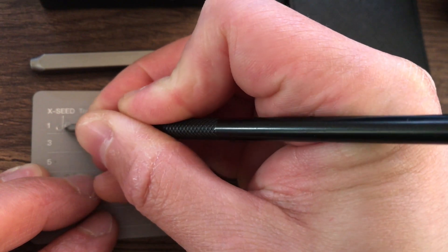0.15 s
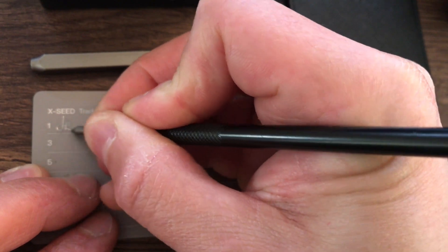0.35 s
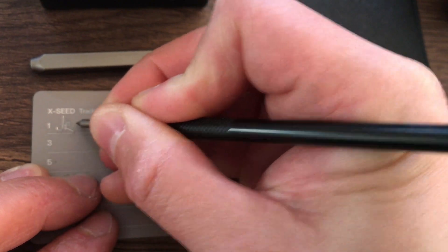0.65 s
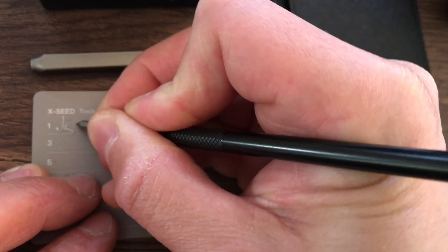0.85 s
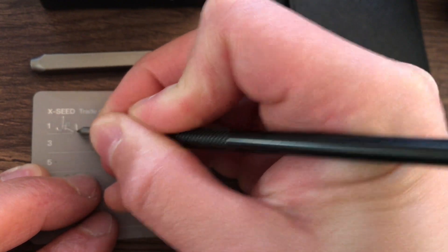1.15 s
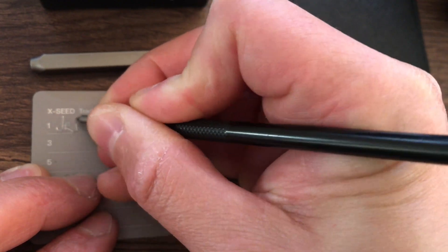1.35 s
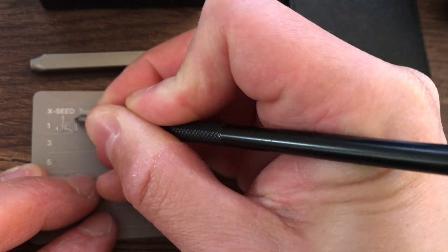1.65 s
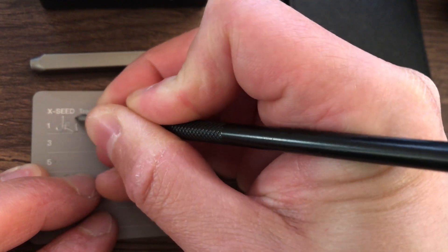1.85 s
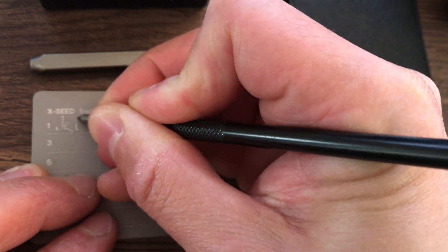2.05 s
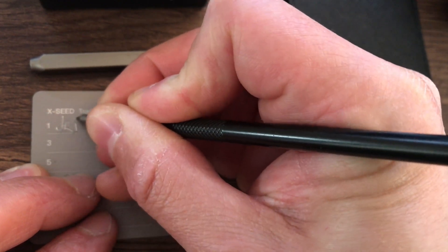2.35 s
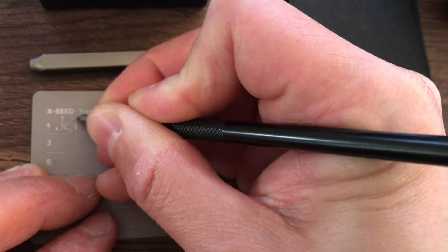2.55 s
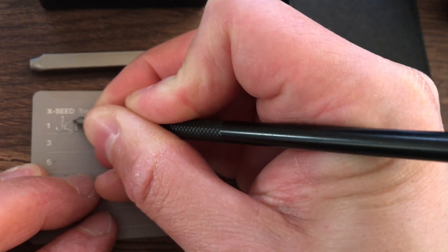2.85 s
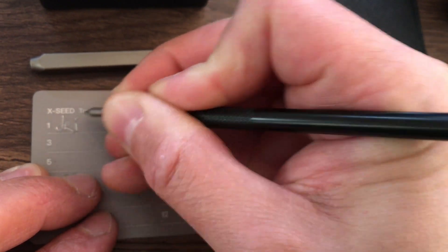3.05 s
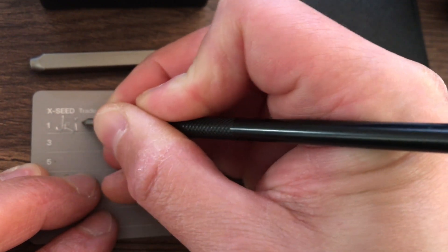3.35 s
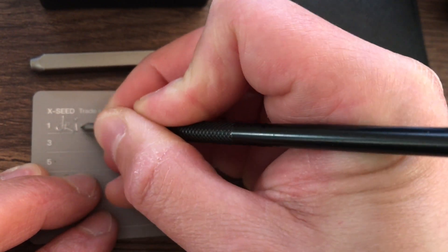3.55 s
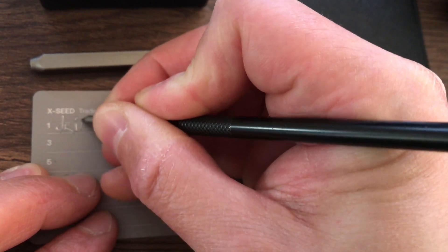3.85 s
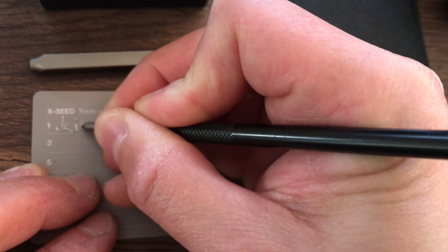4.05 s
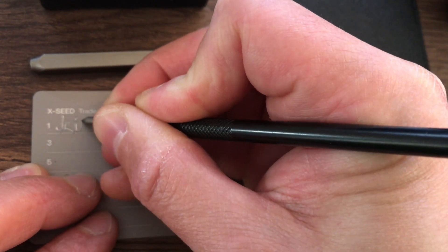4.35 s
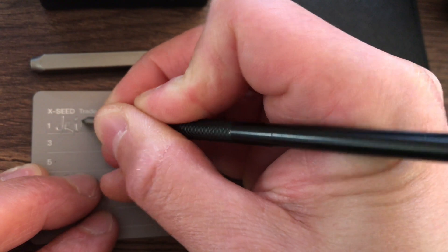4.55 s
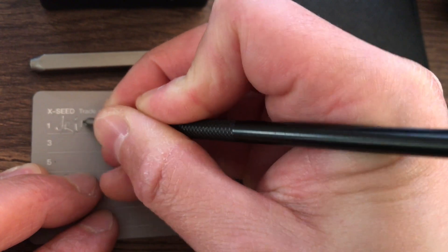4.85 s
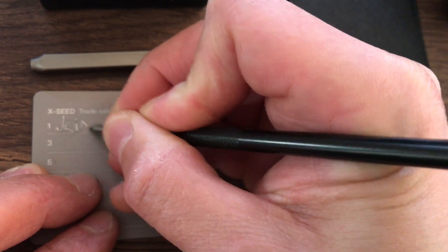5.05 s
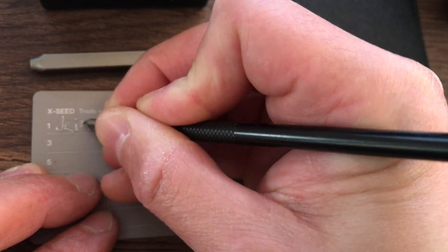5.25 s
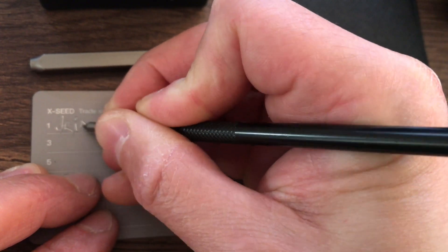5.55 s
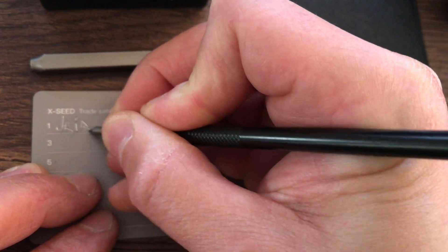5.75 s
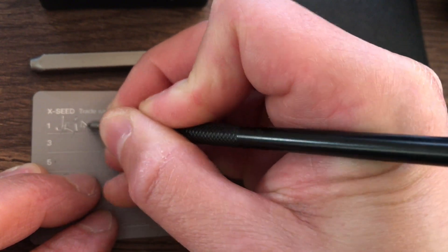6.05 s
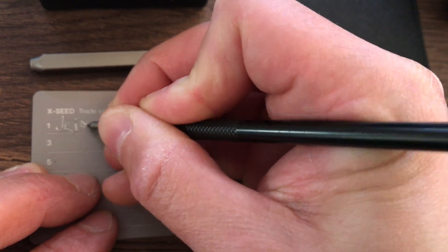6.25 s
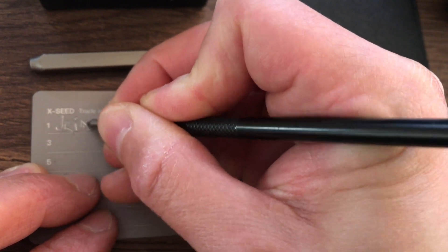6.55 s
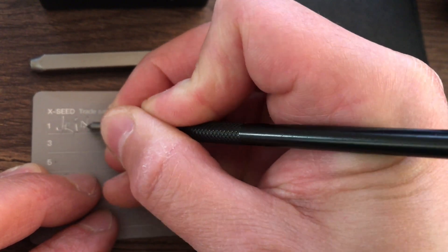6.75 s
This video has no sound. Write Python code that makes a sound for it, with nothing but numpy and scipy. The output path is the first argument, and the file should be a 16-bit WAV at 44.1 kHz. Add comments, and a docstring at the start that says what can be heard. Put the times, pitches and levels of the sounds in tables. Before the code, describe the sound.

A metal pen tip scratches quick, irregular little strokes into a metal plate, with light taps and snags.

```python
"""Engraving pen on aluminium.

A metal tip scratches small marks into a plate held on a wooden desk. It lands with a tap,
ploughs on in tiny slips and snags on burrs; some strokes carry a brief, rough squeal. Pen, plate
and desk ring with every slip, the hand rumbles on the desk, and a small quiet room answers faintly."""
import sys
import numpy as np
from scipy import signal
from scipy.fft import rfft, irfft, next_fast_len
from scipy.io import wavfile
from scipy.ndimage import uniform_filter1d

SR = 44100
rng = np.random.default_rng(int(sys.argv[2]) if len(sys.argv) > 2 else 0)


def dump(signal):
    """Clip the signal to [-1, 1] and save it as 16-bit WAV at the path in sys.argv[1]."""
    limited = np.clip(np.atleast_2d(signal).T, -1, 1)
    pcm = np.round(limited * 32767).astype(np.int16)
    wavfile.write(sys.argv[1], SR, pcm)


N = 303849
FFT_SIZE = next_fast_len(N + SR, True)
BIN_HZ = np.fft.rfftfreq(FFT_SIZE, 1 / SR) + 1  # offset avoids division by zero

# Pen strokes: start_s, length_s, crest_fraction, level_db, bright_db, thud_db
STROKES = [(0.0, 0.17, 0.18, -51, -7.5, 0.5), (0.137, 0.047, 0.32, -59, -3, 6),
           (0.25, 0.17, 0.1, -62, -4.5, 5.5), (0.324, 0.064, 0.72, -52.5, -7, 3.5),
           (0.374, 0.036, 0.66, -41, -2.5, -1.5), (0.855, 0.061, 0.89, -46.5, 4, -5),
           (0.909, 0.059, 0.67, -59.5, 3.5, -15), (1.018, 0.042, 0.35, -38, -4.5, -9.5),
           (1.424, 0.071, 0.53, -60, -6, -6), (1.563, 0.033, 0.92, -49.5, -1, -5),
           (1.68, 0.074, 0.65, -50.5, 2.5, -7), (1.749, 0.088, 0.53, -60, 1, 9),
           (1.812, 0.067, 0.57, -50.5, -4.5, 1.5), (2, 0.057, 0.65, -51.5, 2.5, -4.5),
           (2.079, 0.12, 0.32, -52, -0.5, -1), (2.212, 0.079, 0.63, -50, 0, 3),
           (2.299, 0.1, 0.29, -46.5, 0.5, -5), (2.412, 0.078, 0.45, -50.5, -6, 0.5),
           (2.481, 0.08, 0.46, -49, -2, -4), (2.578, 0.077, 0.17, -57.5, -5, 2),
           (2.649, 0.05, 0.02, -48, -2, -4.5), (2.698, 0.047, 0.61, -48, 1, -3),
           (2.759, 0.038, 0.97, -42.5, 4, -5.5), (2.829, 0.04, 0.08, -42.5, -5, -17),
           (2.886, 0.024, 0.6, -45.5, 0.5, -9), (2.92, 0.037, 1, -57, -6, 1),
           (3.494, 0.083, 0.66, -46, -1, -5), (3.631, 0.04, 0.38, -45.5, -1.5, -4.5),
           (3.746, 0.056, 0.68, -48.5, -2, -3), (3.813, 0.046, 0.52, -42, -3.5, -9.5),
           (3.962, 0.049, 0.19, -50, -2, -2.5), (4.071, 0.034, 0.41, -54.5, -9, 0),
           (4.275, 0.045, 0.43, -50.5, -4, -0.5), (4.325, 0.054, 0.01, -50.5, -2.5, -2),
           (4.579, 0.096, 0.76, -41.5, -1, -5), (4.807, 0.08, 0.49, -52, -8, 4),
           (4.984, 0.12, 0.35, -54.5, -1.5, -2), (5.063, 0.04, 0.39, -42.5, 0.5, -1),
           (5.165, 0.072, 0.68, -34.5, -8.5, -2.5), (5.232, 0.06, 0.37, -64, 4, 10),
           (5.365, 0.082, 0.78, -49, -6, -4.5), (5.503, 0.08, 0.69, -35.5, -5, -6),
           (5.664, 0.06, 0.69, -41.5, -5.5, -5), (5.771, 0.056, 0.34, -39.5, -6.5, -3),
           (6.02, 0.06, 0.97, -39.5, -2.5, -5), (6.176, 0.035, 0.93, -53, -4, 0),
           (6.28, 0.034, 0.01, -44.5, -4, 2), (6.379, 0.067, 0.48, -57.5, -4.5, -0.5),
           (6.511, 0.052, 0.95, -56, 0.5, -3.5), (6.582, 0.066, 0.59, -49, -3.5, -2),
           (6.69, 0.098, 0.0, -43.5, -3.5, -6)]
# Top-octave gain of strokes and snags: time_s, gain_db
SIZZLE = [(0, -1.5), (2.5, -4), (3.0, -2), (3.5, 4), (3.85, 2.5), (4.3, 0), (5.2, -4), (6.89, -1)]
# Tip catching on a burr: start_s, level_db, bright_db
SNAGS = [(0.05, -39, -13), (0.107, -44, -16), (0.145, -42, -7), (0.333, -46, -7), (0.485, -37, -10.5),
         (0.818, -57.5, -5), (1.438, -51.5, -16), (1.507, -50.5, -3.5), (1.536, -54, 1.5),
         (1.692, -48.5, -1), (1.894, -55.5, -7), (2.115, -41, -6.5), (2.217, -40, -2.5), (2.268, -47, 6),
         (2.351, -41.5, 3.5), (2.434, -40, -6.5), (2.455, -41.5, -9), (2.521, -42.5, -7), (2.834, -40, -5),
         (2.852, -40.5, -4), (3.077, -51, -6.5), (3.391, -52, -1), (3.659, -44, -8.5), (3.83, -33.5, 0.5),
         (4.609, -37.5, -2.5), (4.703, -51.5, -7), (4.849, -42.5, -10), (5.067, -30, -9),
         (5.184, -37.5, -1), (5.416, -42.5, -21.5), (5.433, -44, -2.5), (5.509, -41.5, -6),
         (5.526, -34.5, -13.5), (5.549, -30, -6.5), (5.695, -34.5, -9.5), (5.767, -42.5, -19),
         (6.095, -36.5, -3), (6.315, -53.5, -3), (6.611, -31, -4)]
# Brief metallic rings: start_s, length_s, level_db, pitch_hz
SQUEALS = [(0.103, 0.026, -68, 5000), (0.328, 0.057, -60.5, 5050), (1.025, 0.036, -46.5, 4800),
           (1.435, 0.055, -68, 4900), (2.425, 0.026, -55, 4920), (5.209, 0.029, -39, 4760)]
# Partials of a squeal: pitch_ratio, level_db
SQUEAL_PARTIALS = [(0.415, 1.5), (0.53, -2.5), (1, 0.5), (1.93, -8), (2.92, -5)]
# Tip landings: start_s, level_db, bright_db, thud_db
TAPS = [(0.7194, -24.5, -13.5, -5), (1.1643, -30.5, -4.5, -9.5), (1.5644, -41.5, -1, -9),
        (3.0189, -40, -4.5, -0.5), (3.3847, -30, -12, -4), (4.2611, -40.5, -9.5, -11),
        (4.8096, -33.5, -19, -1), (5.3045, -41, -3, -21), (5.9775, -29, -31.5, 1),
        (6.8617, -30, -23.5, 0.5)]
# Resonances of desk (low), plate and pen (high): centre_hz, width_hz, level_db
MODES = [(56.5, 35, 1), (108.7, 30, 4.5), (137, 55, 3.5), (213, 88, 6.5), (240.3, 7.5, 4.5), (295, 30, 0),
         (431, 99, 2), (475, 64, 0), (570, 93, -2), (765, 175, -4.5), (929, 204, -4.5), (1176, 190, -4.5),
         (1412, 390, -0.5), (1664, 178, -1), (2044, 280, -8.5), (2478, 266, -5.5), (2922, 72, -12.5),
         (3445, 650, -16), (4762, 580, -6), (5062, 140, -3.5), (5810, 2360, -14), (6500, 6800, -24.5),
         (9104, 1360, -8), (9840, 330, -12), (11500, 1250, -13.5), (13400, 1250, -10), (14000, 860, -4),
         (14570, 580, -11), (15300, 660, -9.5)]
# Echo spectrum: freq_hz, level_db
ROOM_LEVEL = [(80, -2), (300, -4), (600, -17.5), (1200, -18.5), (2500, -15.5), (6000, -17.5),
              (15000, -22.5)]
# Echo decay: freq_hz, t60_s
ROOM_T60 = [(100, 0.29), (300, 0.32), (1000, 0.41), (2500, 0.39), (5000, 0.33), (15000, 0.31)]
# Spectrum of still air and hiss: freq_hz, relative_db
AIR_SPECTRUM = [(15, -48), (25, -19.5), (86, -3.5), (113, -12), (141, -11.5), (284, -12.5), (500, -23.5),
                (2200, -28), (2810, -31), (4950, -36), (7220, -36.5), (9720, -40), (12400, -35),
                (15800, -37)]


def amp(db):
    """Decibels to gain."""
    return 10 ** (np.asarray(db) / 20)


def unit_rms(x):
    """Scale to an rms of one."""
    return x / np.sqrt(np.mean(abs(x) ** 2) + 1e-20)


def log_interp(table, hz):
    """Interpolate a table over log frequency."""
    freq_hz, value = np.transpose(table)
    return np.interp(np.log(hz + 1), np.log(freq_hz + 1), value)


def add(mix, start_s, sound):
    """Mix a sound in at start_s, row by row."""
    part = mix[:, max(round(start_s * SR), 0):][:, :sound.shape[1]]
    part += sound[:, :part.shape[1]]


def noise(gain):
    """Unit-rms noise with the given spectrum."""
    return unit_rms(irfft(rfft(rng.standard_normal(FFT_SIZE)) * gain, FFT_SIZE)[:N])


def band_gains(level_db, bright_db, thud_db):
    """Strength of one contact as a column: low, mid, high band."""
    return amp(level_db + np.array([[thud_db], [0], [bright_db]]))


def still_air(level_db=-66.5):
    """Steady background of air and hiss."""
    return amp(level_db) * noise(amp(log_interp(AIR_SPECTRUM, BIN_HZ)))


def hand_push(length_s, crest_fraction, bite_s=0.0035, lift_s=0.0034, arch_db=8):
    """One stroke bites, swells to its crest, eases and lifts off."""
    t = np.arange(0, length_s + 10 * lift_s, 1 / SR)
    bite = np.minimum(t / bite_s, 1)
    arch = amp(-arch_db * (2 * (np.minimum(t / length_s, 1) - crest_fraction)) ** 2)
    lift = np.exp(-np.maximum(t - length_s, 0) / lift_s)
    return bite * arch * lift


def stick_slip(median_hz=160, unevenness=0.6, release_cycles=0.25, grip=0.23, spread_db=2.5):
    """The tip sticks, jumps and settles in cycles of uneven length and strength."""
    length_draw, strength_draw = rng.standard_normal((4000, 2)).T
    starts_s = np.cumsum(np.exp(unevenness * length_draw)) / median_hz
    cycles = np.interp(np.arange(N) / SR, starts_s, np.arange(len(starts_s)))
    strength = amp(spread_db * np.clip(strength_draw[cycles.astype(int)], -2, 2))
    return grip + strength * np.exp(-(cycles % 1) / release_cycles)


def burr_drag(burrs_per_s=22, rise_db=5, decay_s=0.0078):
    """Small random burrs each raise the drag briefly."""
    hits = (rng.random(N) < burrs_per_s / SR).astype(float)
    bumps = signal.lfilter([1], [1, -np.exp(-1 / (decay_s * SR))], hits)
    return unit_rms(1 + (amp(rise_db) - 1) * bumps)


def scratching(fractures_per_s=2800, spread_db=2.5, hiss_gain=0.37, trim_db=-0.65):
    """Ploughing force: a hail of tiny fractures that swells and fades with each stroke."""
    power = np.zeros((3, N))
    for start_s, length_s, crest_fraction, *bands_db in STROKES:
        add(power, start_s, (hand_push(length_s, crest_fraction) * band_gains(*bands_db)) ** 2)
    sizes = amp(spread_db * np.minimum(rng.exponential(1, N), 3)) * rng.choice([-1, 1], N)
    fractures = unit_rms(sizes * (rng.random(N) < fractures_per_s / SR))
    slips = (fractures + hiss_gain * rng.standard_normal(N)) * stick_slip()
    slip_power = uniform_filter1d(slips ** 2, size=600)  # divided out: the hand feeds energy evenly
    return amp(trim_db) * np.sqrt(power / slip_power) * slips * burr_drag()


def sizzle(force, corner_hz=12300):
    """The very top of the scratching slowly rises and falls."""
    top = irfft(rfft(force, FFT_SIZE) / (1 + (corner_hz / BIN_HZ) ** 20), FFT_SIZE)[:, :N]
    gain_db = np.interp(np.arange(N) / SR, *np.transpose(SIZZLE))
    return force + top * (amp(gain_db) - 1)


def tip_wander(force, depth_db=2.5, sigma_hz=150, sigma_s=0.01):
    """The moving tip favours now one resonance, now another."""
    hz, t, spectra = signal.stft(force, SR, nperseg=256)
    freq_blur = signal.windows.gaussian(41, sigma_hz / hz[1])[:, None]
    time_blur = signal.windows.gaussian(41, sigma_s / t[1])[None]
    patches = rng.standard_normal(spectra.shape[1:])
    for blur in freq_blur, time_blur:
        patches = signal.fftconvolve(patches, blur, "same")
    tint = unit_rms(amp(depth_db * unit_rms(patches)))
    return signal.istft(spectra * tint, SR, nperseg=256)[1][:, :N]


def hand_rumble(centre_hz=52, width_hz=26, level_db=-63, margin_s=0.06):
    """Hand and plate shift on the desk around each stroke: a soft, deep rumble."""
    power = np.zeros((1, N))
    for start_s, length_s, *_ in STROKES:
        add(power, start_s, signal.windows.hann(int((length_s + 2 * margin_s) * SR))[None] ** 2)
    drag = np.roll(np.sqrt(power[0]), -int(margin_s * SR))
    return amp(level_db) * drag * noise(1 / (1 + (2 * (BIN_HZ - centre_hz) / width_hz) ** 2))


def bass_cut(thud, corner_hz):
    """A brief contact cannot move the whole desk, so it lacks deep bass."""
    return signal.lfilter(*signal.butter(1, corner_hz, "high", fs=SR), thud)


def snagging(length_s=0.0086, cracks_per_s=2200, dust_gain=0.018, trim_db=-2):
    """Snag force: a volley of cracks that swells and dies as a burr crumbles."""
    force = np.zeros((3, N))
    t = np.arange(0, length_s, 1 / SR)
    for start_s, level_db, bright_db in SNAGS:
        chance, polarity, dust = rng.uniform(-1, 1, (3, 1024))[:, :len(t)]
        cracks = np.sign(polarity) * (abs(chance) < cracks_per_s / SR)
        volley = unit_rms((cracks + dust_gain * dust) * np.sin(np.pi * t / length_s))
        thud_db = -9 - 0.84 * bright_db  # duller snags shake the desk more
        add(force, start_s, band_gains(level_db, bright_db, thud_db) * volley)
    force[0] = bass_cut(force[0], corner_hz=216)
    return amp(trim_db) * force


def squealing(pitch_wobble=0.0196, wobble_hz=420, roughness=0.31):
    """Brief, rough metallic ringing near 5 kHz during some strokes."""
    out = np.zeros(N)
    sway, flutter = (noise(1 / (1 + (BIN_HZ / wobble_hz) ** 2)) for _ in range(2))
    warped_s = np.cumsum(1 + pitch_wobble * sway) / SR
    for start_s, length_s, level_db, pitch_hz in SQUEALS:
        span = slice(int(start_s * SR), int((start_s + length_s) * SR))
        phase = 2 * np.pi * pitch_hz * warped_s[span]
        ring = sum(amp(db) * np.sin(ratio * phase) for ratio, db in SQUEAL_PARTIALS)
        ring *= 1 + roughness * flutter[span]
        out[span] += amp(level_db) * unit_rms(ring) * signal.windows.tukey(len(phase), 0.5)
    return out


def tapping(blunt_hz=1100, knock_db=4, bounce_s=0.0019, bounce_db=-7, trim_db=-2):
    """Landing force: one blunt blow and a tiny bounce in the treble."""
    force = np.zeros((3, N))
    for start_s, *bands_db in TAPS:
        blow = band_gains(*bands_db) * np.sqrt(SR / 1000)  # 1 ms of energy in one sample
        add(force, start_s, blow)
        add(force[2:], start_s + bounce_s, amp(bounce_db) * blow[2:])
    force[0] = bass_cut(force[0], corner_hz=90)
    force[1] = amp(knock_db) * signal.lfilter(*signal.butter(1, blunt_hz, fs=SR), force[1])
    return amp(trim_db) * force


def tip_click(tap_force, band_hz=(2600, 7000), gain_db=2):
    """The hard edge of each tap reaches the air straight from the tip."""
    return amp(gain_db) * signal.lfilter(*signal.butter(2, band_hz, "band", fs=SR), tap_force[2])


def plate_on_desk(force, thud_hz=550, bright_hz=3740, dispersion_s=0.002842, zero_lag_hz=7000):
    """The force rings the resonances; bending waves carry treble ahead of bass."""
    gain = np.sqrt(sum(amp(db) ** 2 / (1 + (2 * (BIN_HZ - centre_hz) / width_hz) ** 2) ** 2
                       for centre_hz, width_hz, db in MODES))
    log_gain = np.log(gain + 1e-5)
    mirrored = np.r_[log_gain, log_gain[FFT_SIZE - len(BIN_HZ):0:-1]]
    minimum_phase = -signal.hilbert(mirrored).imag[:len(BIN_HZ)]
    lag_s = dispersion_s * (np.sqrt(1000 / BIN_HZ) - np.sqrt(1000 / zero_lag_hz))
    bending_phase = -2 * np.pi * np.cumsum(lag_s) * SR / FFT_SIZE
    low = 1 / (1 + (BIN_HZ / thud_hz) ** 6)  # desk
    high = 1 / (1 + (bright_hz / BIN_HZ) ** 10)  # sharp tip
    bands = low, 1 - low - high, high
    spectrum = sum(rfft(part, FFT_SIZE) * unit_rms(gain * band) for part, band in zip(force, bands))
    return irfft(spectrum * np.exp(1j * (minimum_phase + bending_phase)), FFT_SIZE)[:N]


def room_tail(first_echo_s=0.0042):
    """Diffuse tail, strongest in the bass where the desk keeps ringing."""
    hz, t, spectra = signal.stft(rng.choice([-1., 1.], SR // 2), SR, nperseg=256)
    fade = amp(-60 * t / log_interp(ROOM_T60, hz)[:, None])
    fade *= np.clip(t / first_echo_s - 1, 0, 1)
    energy = np.mean(fade ** 2, axis=1, keepdims=True) * SR / 2
    fade *= amp(log_interp(ROOM_LEVEL, hz))[:, None] / np.sqrt(energy)
    return signal.istft(spectra * fade, SR, nperseg=256)[1]


def room_echo(x, turn_s=0.11, tails=5):
    """Several random tails take turns, so the echo stays smooth and free of fixed peaks."""
    turn = np.arange(N) / SR / turn_s
    crossfades = (np.sin(np.pi / 2 * np.minimum((turn - k) % tails, 2)) for k in range(tails))
    return sum(signal.oaconvolve(x * fade, room_tail())[:N] for fade in crossfades)


def scene():
    """Pen on plate, its echo, still air and hand rumble; mono."""
    drag_force = tip_wander(sizzle(scratching() + snagging()))
    tap_force = tapping()
    pen = plate_on_desk(drag_force + tap_force) + squealing() + tip_click(tap_force)
    return (pen + room_echo(pen) + still_air() + hand_rumble())[None]


def record(dry):
    """Steep low-pass band limit."""
    edge_hz = 15850
    lowpass = signal.firwin(401, edge_hz, window=("kaiser", 8), fs=SR)
    return signal.oaconvolve(dry, lowpass[None], "same")


dry = scene()
out = record(dry)
dump(out)
```